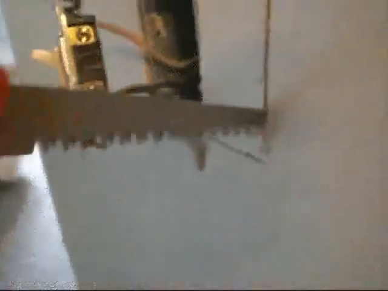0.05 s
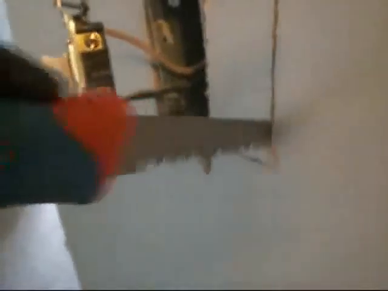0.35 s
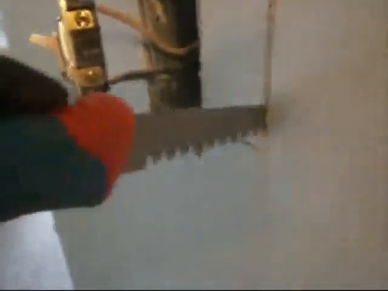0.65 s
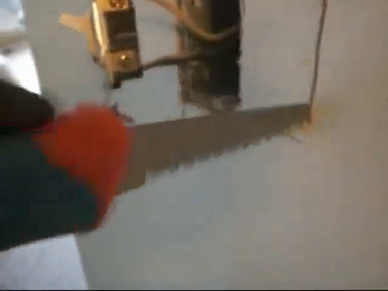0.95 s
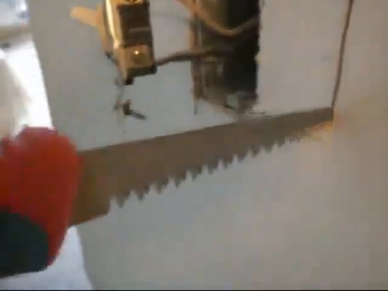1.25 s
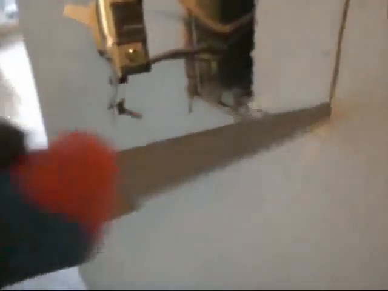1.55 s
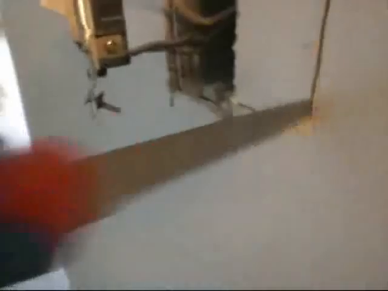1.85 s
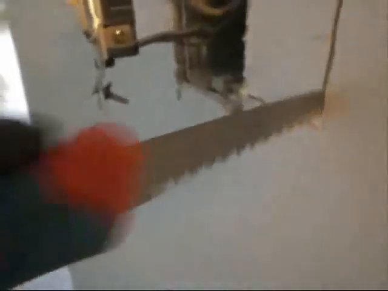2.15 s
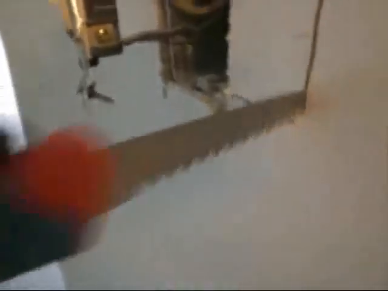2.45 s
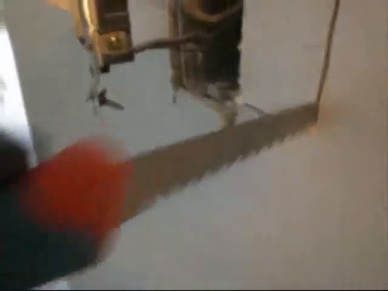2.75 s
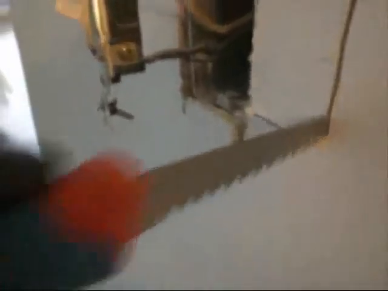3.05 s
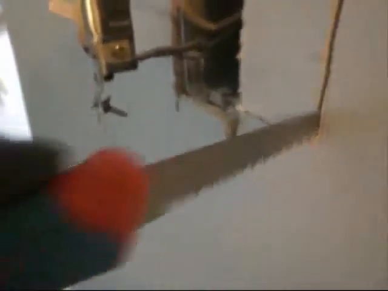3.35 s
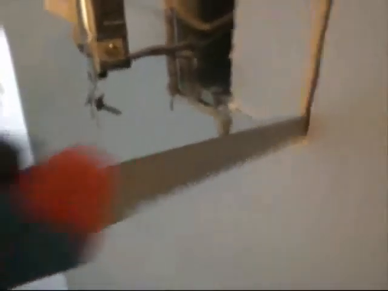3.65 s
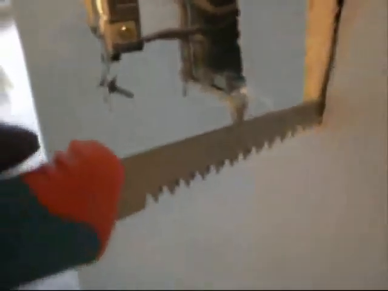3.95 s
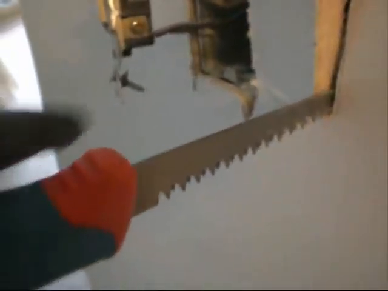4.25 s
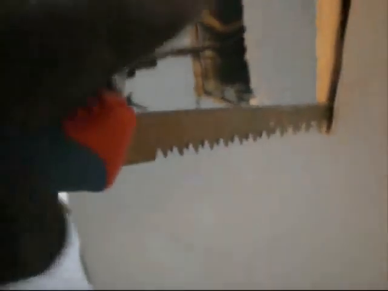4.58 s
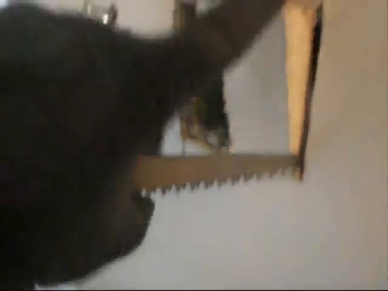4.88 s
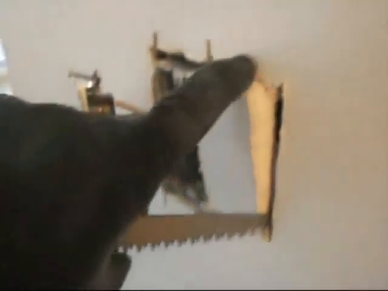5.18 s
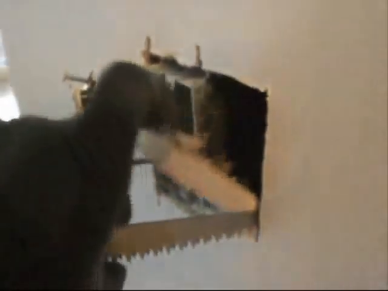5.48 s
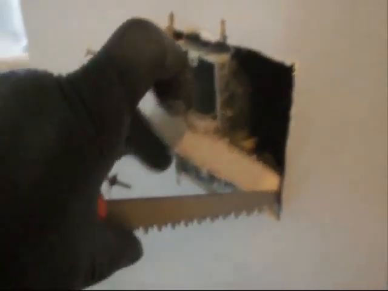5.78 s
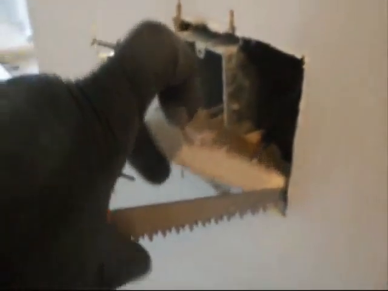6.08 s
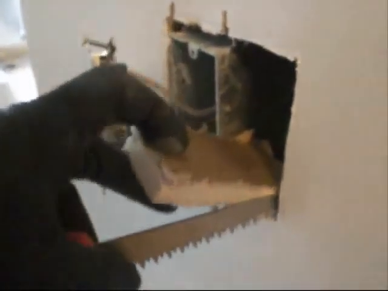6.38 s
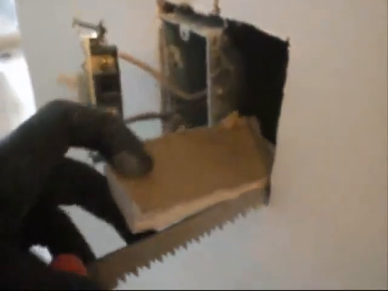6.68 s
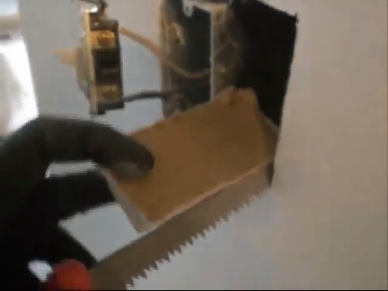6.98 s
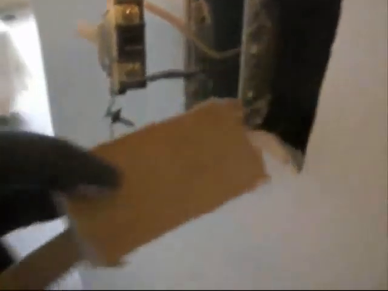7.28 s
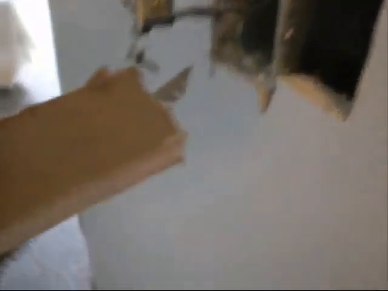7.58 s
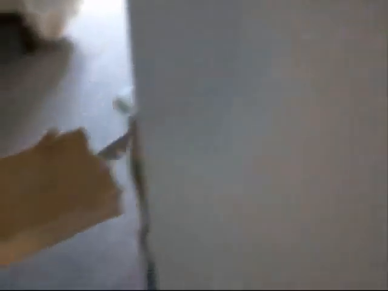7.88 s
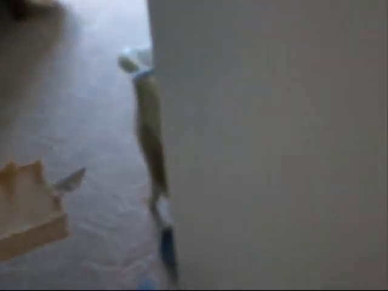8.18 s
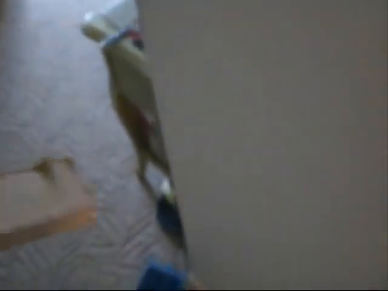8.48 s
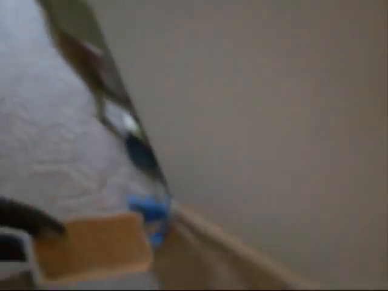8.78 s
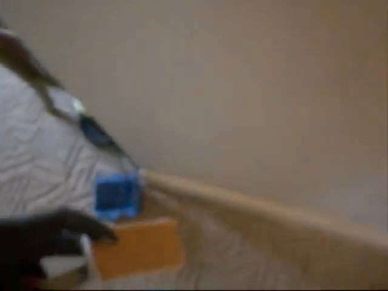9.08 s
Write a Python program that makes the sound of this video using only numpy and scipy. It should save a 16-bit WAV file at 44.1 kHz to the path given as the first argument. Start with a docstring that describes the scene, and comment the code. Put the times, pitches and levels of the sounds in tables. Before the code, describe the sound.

Heard close up in a small room, fast saw strokes crunch through a plaster wall, with crumbly hiss, sharp catches and hollow thumping. Then it gets much quieter: the loose piece of board rubs, knocks and cracks against the edge of the hole. The metal blade strikes once with a loud, bouncing clink, and a sleeve swishes softly among the last light knocks. Faint room air and a low hum lie underneath.

```python
"""Jab saw in drywall

Quick strokes, close up in a small room: the teeth crumble the plaster, snag, and drum the hollow wall.
The cut piece is worked loose with scrapes and knocks, the blade clinks, and a sleeve swishes
as the piece is carried off. Room air and a faint hum lie underneath."""
import sys
import numpy as np
from scipy import signal
from scipy.fft import rfft, irfft
from scipy.io import wavfile
from scipy.ndimage import uniform_filter1d

SR = 44100
rng = np.random.default_rng(int(sys.argv[2]) if len(sys.argv) > 2 else 0)


def generate_wav(signal):
    """Clip the signal to [-1, 1] and save it as 16-bit WAV at the path in sys.argv[1]."""
    frames = np.transpose(np.atleast_2d(signal))
    scaled = np.clip(frames, -1, 1) * 32767
    pcm = np.round(scaled).astype(np.int16)
    wavfile.write(sys.argv[1], SR, pcm)


N = 406853
TIME = np.arange(N) / SR
EVENT_N = SR // 2
CRUNCH_DB_PER_DB = 0.54  # growth with stroke force

# plaster hiss spectrum: f/Hz, level/dB
HISS_EQ = [(1500, -29), (3300, -0.5), (5000, 4.5), (7000, -3.5), (7400, -7.5), (8600, 6.5), (10000, 1.5),
           (11000, -1.5), (12600, 0), (14000, 4)]
# plaster crunch spectrum: f/Hz, level/dB
CRUNCH_EQ = [(30, -2), (200, 5.5), (600, 6.5), (900, 8), (1270, 1), (1700, -1), (2200, 0.5), (3100, 2.5),
             (3800, -16.5), (6000, -4), (12000, -18.5)]
# push and pull in turn: t/s, length/s, force/dB
SAW_STROKES = [(-.04, 0.12, -12), (0.182, 0.072, -18.5), (0.221, .096, 0), (0.379, .175, -7.5),
               (0.594, 0.1, -2), (0.785, 0.15, -5.5), (0.992, 0.15, -0.5), (1.166, 0.15, -3),
               (1.351, 0.13, 2.5), (1.539, 0.13, -1), (1.695, 0.11, 2), (1.867, 0.12, -2),
               (2.042, 0.093, 2), (2.209, 0.089, -1.5), (2.348, .1, 2.5), (2.496, 0.11, -3),
               (2.649, .11, 1.5), (2.791, .125, -4.5), (2.951, 0.1, 2), (3.088, 0.13, -4.5),
               (3.254, 0.094, 3), (3.401, .11, -7.5), (3.536, 0.12, -5.5), (3.68, .126, -4.5),
               (3.814, .135, -24)]

def sawing(wall, slide_s=.03, snag_low_hz=1290, snag_high_hz=4960):
    """In each stroke the blade slides, bites and makes two small snags."""
    out = np.zeros(N)
    for start, seconds, force_db in SAW_STROKES:
        add(out, start, stroke(start, seconds, force_db, wall))
        slide = colour(rng.standard_normal(EVENT_N) * arch(seconds + 2 * slide_s), HISS_EQ)
        add(out, start - slide_s, tooth_fill(force_db) * held(slide, -45, seconds))
        for place, pitch, size in 2 * rng.random((2, 3)) - 1:
            db = -20 + CRUNCH_DB_PER_DB * force_db + 2 * size
            hz = snag_low_hz * (snag_high_hz / snag_low_hz) ** ((1 + pitch) / 2)
            add(out, start + seconds * (.5 + .3 * place), tooth_fill(force_db) * snag(db, hz, wall))
    return out


def stroke(start, seconds, force_db, wall, lean_db=2, wall_lag_s=.0046):
    """Each bite sheds grains and kicks the wall; friction sways the sheet's two lowest modes."""
    speed = arch(seconds)
    lean = amp(lean_db * np.clip(TIME[:EVENT_N] / seconds, 0, 1))
    bites = tooth_bites(speed)
    crumble = (.89 + excite(bites, fade(.014))) * speed ** .25 * lean
    hiss = unit(colour(grains(9000, 4) * crumble, HISS_EQ)) + amp(-7) * unit(chips(crumble))
    crunch = colour(grains(4000, 3.5) * crumble, CRUNCH_EQ)
    drag_change = bites - uniform_filter1d(bites, SR // 100)
    drum = excite(drag_change * arch(seconds, wall_lag_s) ** .89 * lean ** 1.2, wall)
    sway = excite(rng.standard_normal(EVENT_N) * speed, ring(WALL_MODES[:2]))
    past_mid_cut_s = start - 2  # the cut gets smoother and sways less as it goes
    crunch_db = -31 + CRUNCH_DB_PER_DB * force_db - .6 * past_mid_cut_s
    sway_db = -38 - 2.5 * past_mid_cut_s
    hiss_db = -31.5 + rng.uniform(-.2, .2)
    friction = tooth_fill(force_db) * (held(hiss, hiss_db, seconds) + held(sway, sway_db, seconds))
    return friction + held(crunch, crunch_db, seconds) + held(drum, force_db - 14, seconds)


def tooth_bites(speed, tooth_hz=260, spread_db=4):
    """Uneven impulses whose rate rises with blade speed."""
    gap, depth = rng.standard_normal((128, 2)).T
    travel = np.cumsum(np.sqrt(speed)) * tooth_hz / SR
    teeth = np.cumsum(np.exp(.6 * gap))
    reached = teeth < travel[-1]
    bites = np.zeros(EVENT_N)
    bites[np.searchsorted(travel, teeth[reached])] = amp(spread_db * np.clip(depth[reached], -2, 1))
    return bites


def tooth_fill(force_db, full_db=-11.5):
    """How full the teeth are, 0 to 1; saturates above full_db."""
    return np.tanh(amp(force_db - full_db))


def chips(crumble, count=170, low_hz=2300, high_hz=10500, spread_db=4):
    """Plaster chips break off, each with its own brief ping."""
    out, size = np.zeros(N), SR // 25
    places, pitches = rng.random((2, count))
    gains = amp(spread_db * np.clip(rng.standard_normal(count), -2, 2))
    for place, pitch, gain in zip(places, pitches, gains):
        i = int(place * EVENT_N)
        hz = low_hz + (high_hz - low_hz) * pitch ** 1.2
        out[i:i + size] += crumble[i] * gain * fade(.015, size) * np.sin(2 * np.pi * hz * TIME[:size])
    return out[:EVENT_N]


# hard tooth catches: t/s, level/dB, brightness f/Hz
HARD_SNAGS = [(.229, -9.5, 2180), (0.2499, -8, 1700), (.257, -5.5, 1880), (0.296, -10.5, 5000),
              (0.306, -9, 2190), (.421, -14, 1490), (.445, -10.5, 6040), (.617, -19, 4500),
              (.634, -8, 4240), (.680, -6.5, 1400), (.931, -15, 5800), (1.015, -25, 1990),
              (1.399, -8.5, 1400), (2.058, -6.5, 2070), (2.074, -14.5, 1000), (2.242, -20, 1400),
              (2.383, -13, 1520), (2.68, -8, 2030), (2.822, -15.5, 2830), (3.266, -11.5, 7150),
              (3.308, -15, 1620), (3.614, -7.5, 5000)]

def hard_snags(wall):
    """Now and then a tooth catches hard."""
    out = np.zeros(N)
    for start, db, hz in HARD_SNAGS:
        add(out, start, snag(db, hz, wall))
    return out


def snag(db, hz, wall):
    """A tooth lets go with a crack and a wall thud."""
    return blow(burst(.009) + .1 * burst(.03), wall, db, hz, even_hz=1860)


def blow(noise, thud, db, hz, even_hz, db_per_octave=8):
    """A crack strongest at hz plus a thud: equal at even_hz, more thud when duller."""
    crack = colour(noise, [(hz / 4, -15), (hz, 0), (hz * 3, -10), (hz * 10, -34)])
    return peaked(crack, db) + peaked(thud, db - db_per_octave * np.log2(hz / even_hz))


# wall modes: f/Hz, t60/s, resonance level/dB
WALL_MODES = [(66, 0.94, -4), (91.4, 0.4, -4), (117, 0.37, -35), (154.6, 0.59, -1), (180.4, 0.23, -2),
              (213.3, 0.074, 3), (233.3, 0.12, 2.5), (268.3, 0.26, 2), (313.7, 0.1, -8), (345.8, 0.14, -11),
              (405.6, 0.057, -13.5), (456, 0.08, -15), (520.6, 0.085, -10), (627, 0.018, -22),
              (665, 0.043, -38), (1021, 0.029, -15)]
# board radiation: f/Hz, level/dB
RADIATION_EQ = [(25, -30), (60, -11.5), (110, -6), (170, 2.5), (300, 2), (480, 4), (1200, -5.5)]

def hollow_wall():
    """Impulse response of the wall; the board radiates little deep bass."""
    # a short mode needs a harder start for the same resonance
    modes = [(hz, t60, db - 20 * np.log10(t60)) for hz, t60, db in WALL_MODES]
    return colour(ring(modes, in_step=True), RADIATION_EQ)


# scrape spectrum: f/Hz, level/dB
SCRAPE_EQ = [(40, -15), (110, 4), (400, 3.5), (750, -0.5), (1200, -6.5), (2000, -10.5), (3200, -14),
             (5500, -14), (8000, -16), (13000, -20)]
# board and glove rubs: t/s, length/s, level/dB, brightness f/Hz
BOARD_RUBS = [(4.339, 0.33, -46.5, 3900), (4.734, 0.11, -48.5, 10000), (4.862, 0.12, -48, 5800),
              (5.396, .11, -42.5, 4120), (5.509, 0.11, -48, 7250), (5.875, 0.16, -44.5, 4000),
              (6.262, .06, -46, 12500), (6.342, 0.13, -51, 12500), (6.533, 0.3, -45.5, 3260),
              (6.88, 0.074, -36, 3800), (6.964, 0.11, -45.5, 4030), (7.08, 0.084, -36.5, 2970),
              (7.896, 0.074, -51.5, 4500), (8.618, 0.21, -43, 2640)]

def scrapes():
    """The cut piece catches and slips along the edge of the hole."""
    out = np.zeros(N)
    for start, seconds, db, hz in BOARD_RUBS:
        grip = amp(2.9 * flutter(EVENT_N, SR // 80))
        rub = colour(grains(6000, 3.8) * grip * arch(seconds) ** .38, SCRAPE_EQ)
        rub = loose_piece(rub, ring_db=-10)
        rub = colour(rub, [(hz / 4, -6.8), (hz, 0), (hz * 4, -6.8)])
        add(out, start, held(rub, db, seconds))
    return out


# board knocks: t/s, level/dB, brightness f/Hz
BOARD_KNOCKS = [(4.319, -32.5, 1400), (4.441, -24.5, 1870), (4.517, -38.5, 600), (5.394, -34, 5000),
                (5.443, -25, 1250), (5.469, -34, 950), (5.982, -11.5, 8500), (7.004, -27, 3480),
                (7.094, -31.5, 900), (7.124, -38.5, 600), (7.152, -26.5, 2600), (7.179, -17.5, 7700),
                (8.011, -22.5, 840), (8.492, -36, 900), (8.851, -34, 1400)]

def knocks(wall):
    """The handled board cracks, then chatters briefly against its edge."""
    out = np.zeros(N)
    thud_eq = [(100, -1.5), (190, -4.5), (260, 0), (340, -3.5), (480, -.5), (850, 5), (2000, -14)]
    for start, db, hz in BOARD_KNOCKS:
        crack = loose_piece(burst(.018) + .1 * burst(.06), ring_db=-7)
        chatter = excite(burst(.035), wall * fade(.06))
        add(out, start, blow(crack, colour(chatter, thud_eq), db, hz, even_hz=1650))
    return out


# cut piece modes: f/Hz, t60/s, level/dB
PIECE_MODES = [(430, .025, -12), (760, .03, -5), (870, .025, -5), (1180, .02, -5), (1500, .025, -5),
               (1900, .02, -4), (2450, .018, -3), (3100, .018, -4), (4500, .02, -7), (5350, .02, -7),
               (6600, .015, -11)]

def loose_piece(contact, ring_db):
    """Contact noise plus the ring it wakes in the piece."""
    return unit(contact) + amp(ring_db) * unit(excite(contact, ring(PIECE_MODES)))


# blade modes: f/Hz, t60/s, level/dB
BLADE_MODES = [(620, .11, -5), (722, .09, -13), (1130, .093, 0), (1490, .25, 1), (2000, .056, -6),
               (2270, .078, -4), (2750, .05, -5), (3150, .06, -3), (4200, .04, 2), (4480, .08, 1.5),
               (5100, .05, -8), (5970, .04, -2), (6200, .045, 2), (6650, .04, -2), (7100, .05, -4),
               (8400, .035, -3), (8700, .03, 5), (8900, .035, 6), (10080, .04, -1), (12100, .04, -2)]
# blows on the blade: t/s, level/dB, brightness f/Hz
BLADE_HITS = [(7.182, -22, 600), (7.195, -22.5, 670), (7.271, 0.1, 13000), (7.284, -12, 11800),
              (7.2981, -10, 12000), (7.309, -16.5, 9000)]

def clinks():
    """The freed blade strikes an edge and bounces; the hand damps it to a faint after-ring."""
    out = np.zeros(N)
    after_ring = ring([(1450, .28, -7), (4500, .26, 3)])
    blade = peaked(ring(BLADE_MODES) * fade(.19), 0) + peaked(after_ring, -30)
    for start, db, hz in BLADE_HITS:
        scuff = colour(burst(.055), [(300, -20), (700, 0), (3000, 0), (9000, -4), (14000, -12)])
        hit = colour(blade + peaked(scuff, -3), [(hz, 0), (hz * 8, -26)])  # softer contact, less treble
        add(out, start, peaked(hit, db))
    return out


# sleeve slide: t/s, thread-crossing f/Hz
SLEEVE_PITCH = [(8.39, 1710), (8.476, 3010), (8.505, 5000), (8.529, 6100), (8.609, 5160), (8.64, 3640),
                (8.68, 1890)]

def sleeve(start_db=-60, swell_db=16, patchy_db=5, wobble_hz=360, fade_s=.012):
    """Ribbed cloth slides over itself, pressing ever harder: a broken zip whose pitch follows speed."""
    times, hz = np.transpose(SLEEVE_PITCH)
    pitch = np.interp(TIME, times, hz) + wobble_hz * flutter(N, SR // 3000)
    phase = 2 * np.pi * np.cumsum(pitch) / SR
    zip_tone = np.sin(phase) + amp(-13) * np.sin(2 * phase)
    contact = np.clip(np.minimum(TIME - times[0], times[-1] - TIME) / fade_s, 0, 1)
    progress = np.clip((TIME - times[0]) / (times[-1] - times[0]), 0, 1)
    return zip_tone * contact * amp(start_db + swell_db * progress + patchy_db * flutter(N, SR // 100))


def room(x, wet_db, t60, treble_t60):
    """Small room: a broad tail and a faint, longer treble tail build up over the first reflections."""
    tail = colour(burst(t60), [(150, 3.5), (800, 5), (2500, 5), (7000, 2)])
    tail += colour(burst(treble_t60), [(2000, -36), (6000, -13)])
    tail *= 1 - fade(.011)
    return x + amp(wet_db) * excite(x, tail / np.sqrt(np.sum(tail ** 2)))


# room air spectrum: f/Hz, level/dB
AIR_EQ = [(15, -92), (25, -15), (88, -11.5), (164, -11), (214, -6.5), (263, -11.5), (370, -10),
          (694, -16.5), (1140, -19), (1560, -20.5), (3330, -27), (6760, -31), (7500, -35.5), (9250, -32.5),
          (13000, -41.5)]

def background(air_db=-48.3, hum_hz=215, hum_db=-56, waver=.19):
    """Steady room air with a wavering hum."""
    drift = unit(signal.sosfilt(signal.butter(2, 7, fs=SR, output="sos"), rng.standard_normal((2, N))))
    phase = 2 * np.pi * hum_hz * TIME
    hum = (1 + waver * drift[0]) * np.sin(phase) + waver * drift[1] * np.cos(phase)
    return amp(air_db) * unit(colour(rng.standard_normal(N), AIR_EQ)) + amp(hum_db) * unit(hum)


def amp(db):
    return 10 ** (np.asarray(db) / 20)


def unit(x):
    """Scale to rms 1."""
    return x / np.sqrt(np.mean(x ** 2))


def peaked(x, db):
    """Scale to a peak level."""
    return x * amp(db) / np.abs(x).max()


def held(x, db, seconds):
    """Scale to the energy of a level held for some seconds."""
    return x * amp(db) * np.sqrt(seconds * SR / np.sum(x ** 2))


def add(out, start_s, x):
    """Mix x in at start_s."""
    i = int(start_s * SR)
    x, i = x[max(-i, 0):], max(i, 0)
    out[i:i + len(x)] += x[:N - i]


def excite(x, response):
    """Convolve, keeping the length of x."""
    return signal.fftconvolve(x, response)[:len(x)]


def colour(x, points, size=4096):
    """Minimum-phase filter through (f/Hz, level/dB) points."""
    hz, db = np.transpose(points)
    bin_hz = np.arange(size // 2 + 1) * SR / size
    log_gain = np.log(amp(np.interp(np.log(bin_hz + 1), np.log(hz), db)))
    cepstrum = irfft(log_gain)[:size // 2]
    cepstrum[1:] *= 2
    return excite(x, irfft(np.exp(rfft(cepstrum, size))))


def fade(t60, size=EVENT_N):
    """Exponential decay, 60 dB in t60 seconds."""
    return np.exp(-np.log(1000) * TIME[:size] / t60)


def ring(modes, in_step=False):
    """Decaying modes: in step at the struck point, alternating in sign elsewhere."""
    sign = 1 if in_step else -1
    return sum(sign ** k * amp(db) * fade(t60) * np.sin(2 * np.pi * hz * TIME[:EVENT_N])
               for k, (hz, t60, db) in enumerate(modes))


def burst(t60):
    """Decaying noise."""
    return fade(t60) * rng.standard_normal(EVENT_N)


def flutter(size, window):
    """Smoothed noise, rms 1."""
    return unit(uniform_filter1d(rng.standard_normal(size), window))


def grains(rate_hz, spread_db):
    """Random tiny fractures of uneven size."""
    clicks = (rng.random(EVENT_N) < rate_hz / SR) * rng.choice([-1, 1], EVENT_N)
    return clicks * amp(spread_db * np.clip(rng.standard_normal(EVENT_N), -2, 2))


def arch(seconds, delay_s=0):
    """Speed of a hand that starts, slides and stops."""
    return np.sin(np.pi * np.clip((TIME[:EVENT_N] - delay_s) / seconds, 0, 1)).clip(0)


def scene():
    """Sawing, then handling, over the room's air."""
    wall = hollow_wall()
    saw = room(sawing(wall) + hard_snags(wall), wet_db=-11, t60=.4, treble_t60=.77)
    handling = scrapes() + knocks(wall) + clinks() + sleeve()
    handling = room(handling, wet_db=-10.5, t60=.18, treble_t60=.5)
    return (saw + handling + background())[None]


def record(dry, ceiling=.8, top_hz=12900):
    """Clip the highest peaks, then low-pass."""
    lowpass = signal.ellip(10, .2, 80, top_hz, fs=SR, output="sos")
    return signal.sosfilt(lowpass, np.clip(dry, -ceiling, ceiling))


dry = scene()
out = record(dry)
generate_wav(out)
```